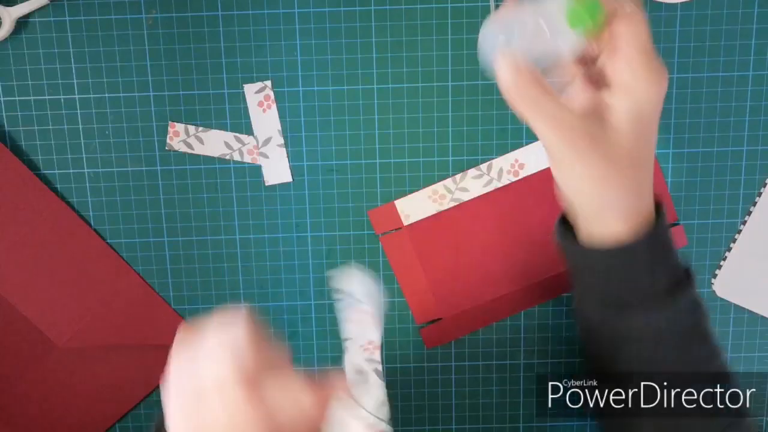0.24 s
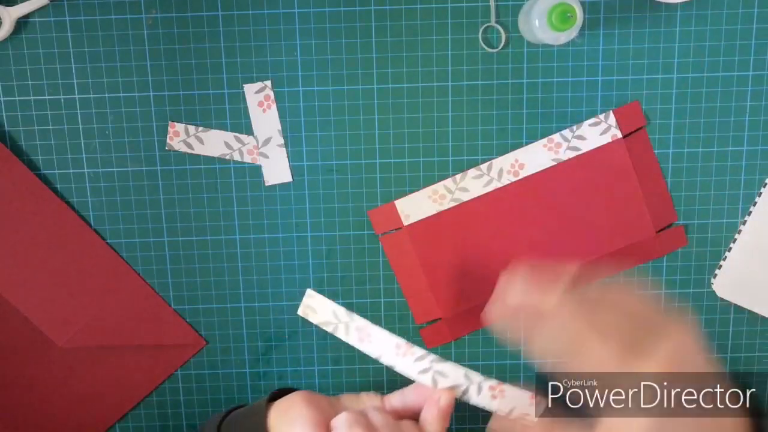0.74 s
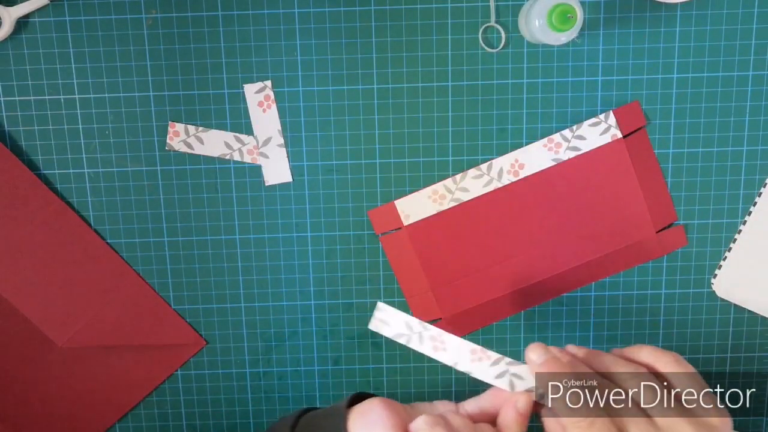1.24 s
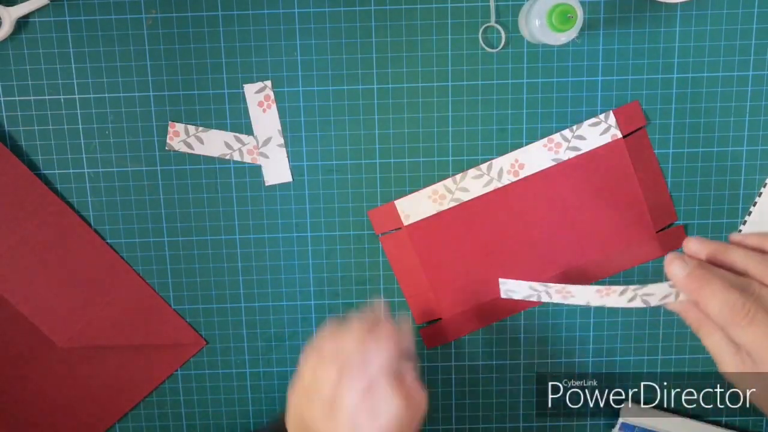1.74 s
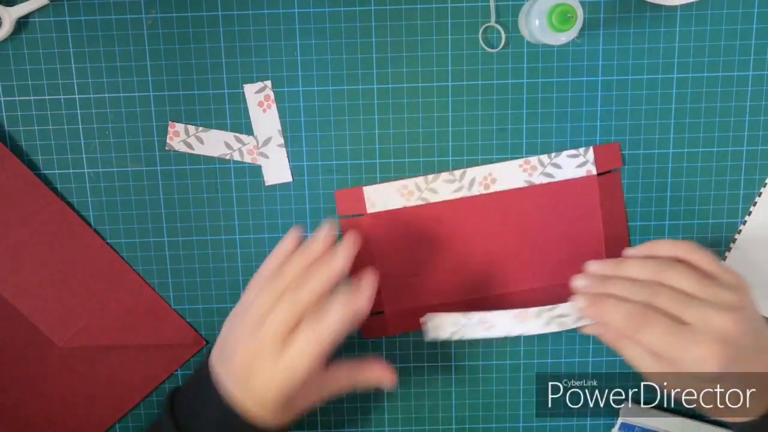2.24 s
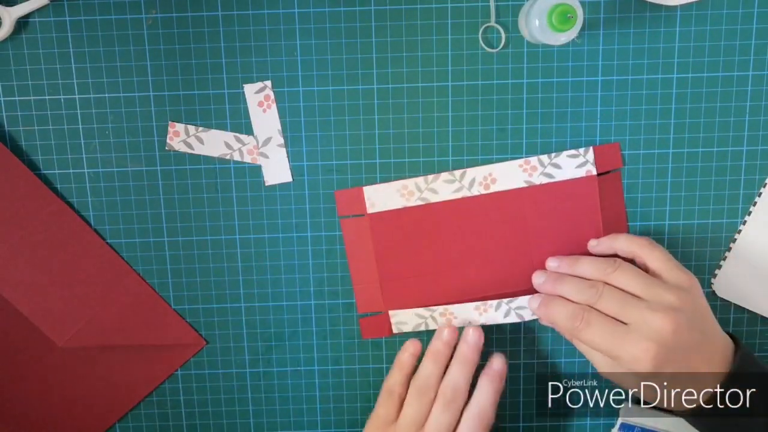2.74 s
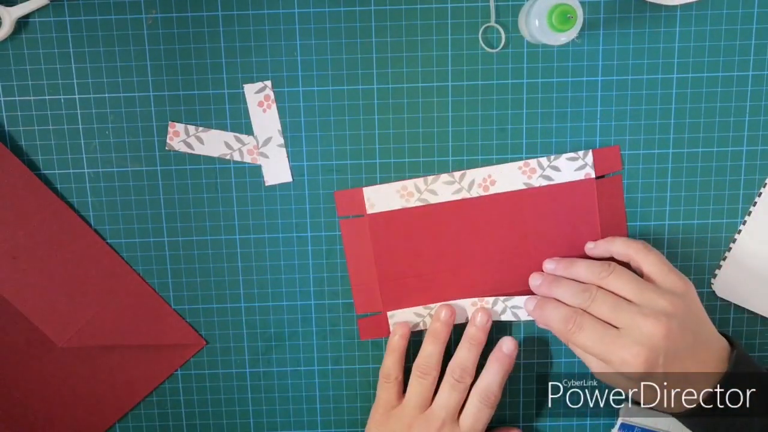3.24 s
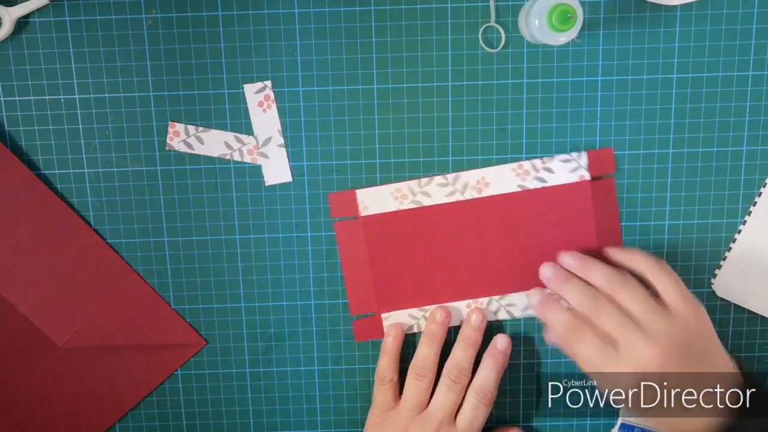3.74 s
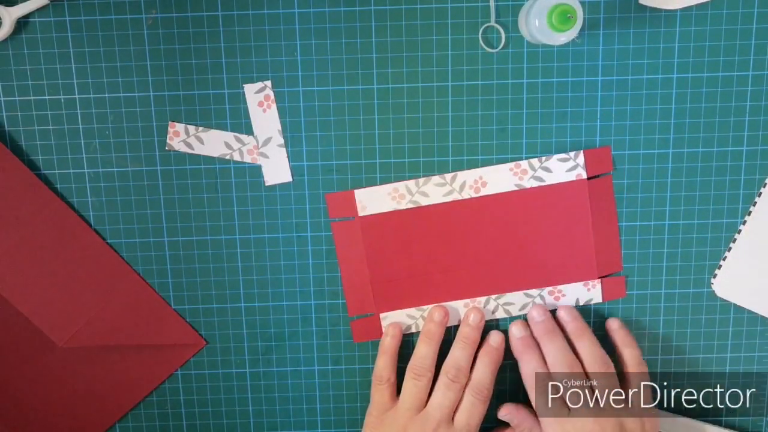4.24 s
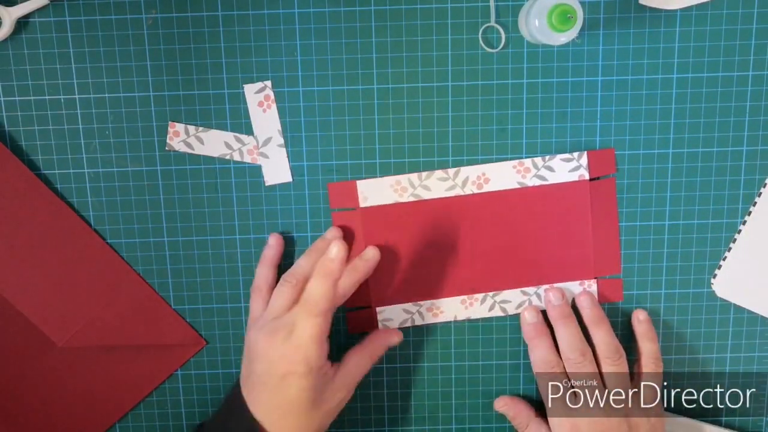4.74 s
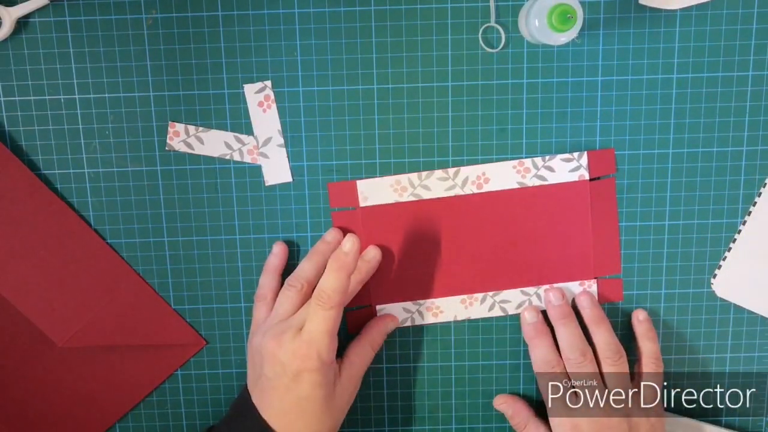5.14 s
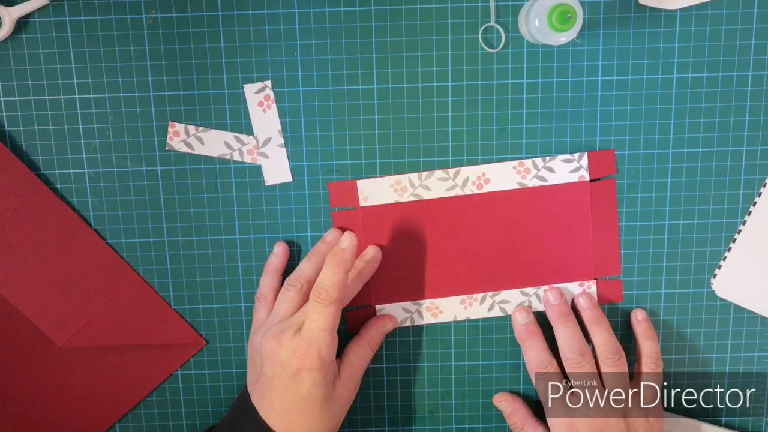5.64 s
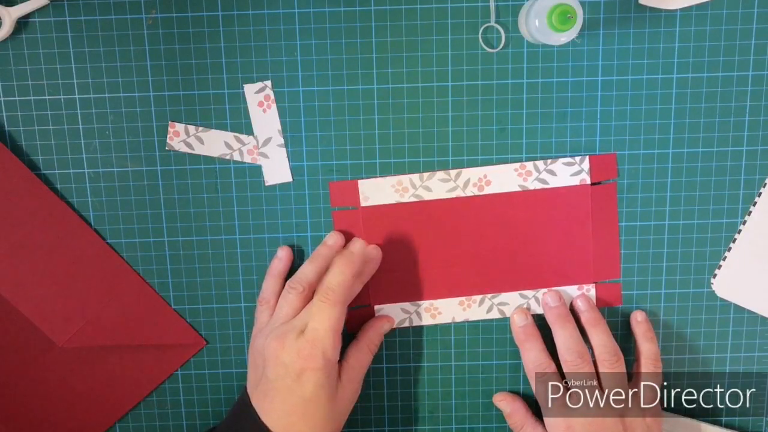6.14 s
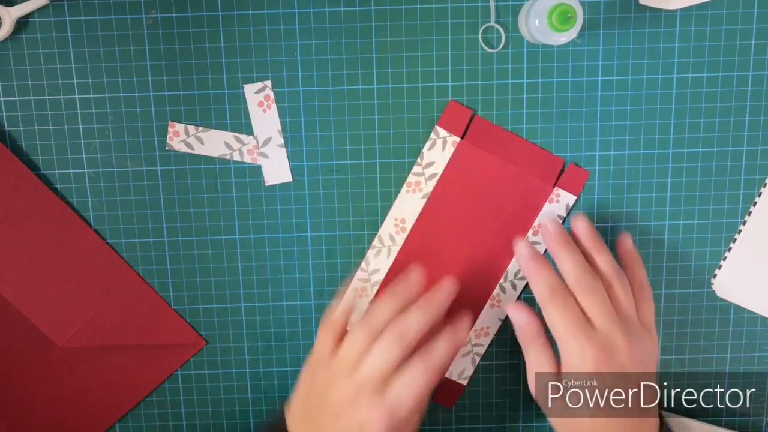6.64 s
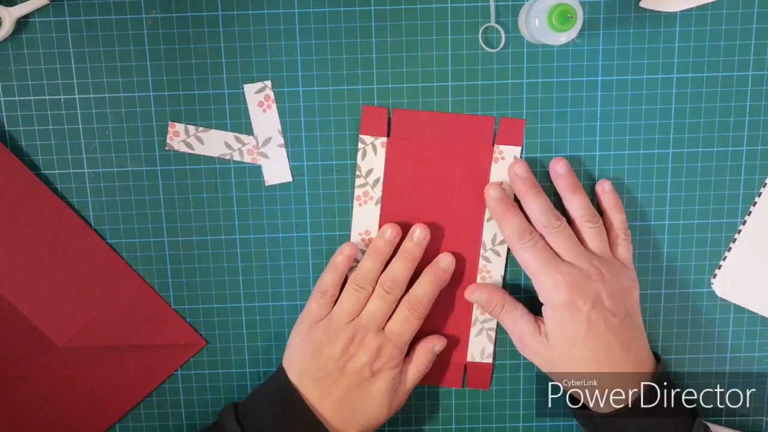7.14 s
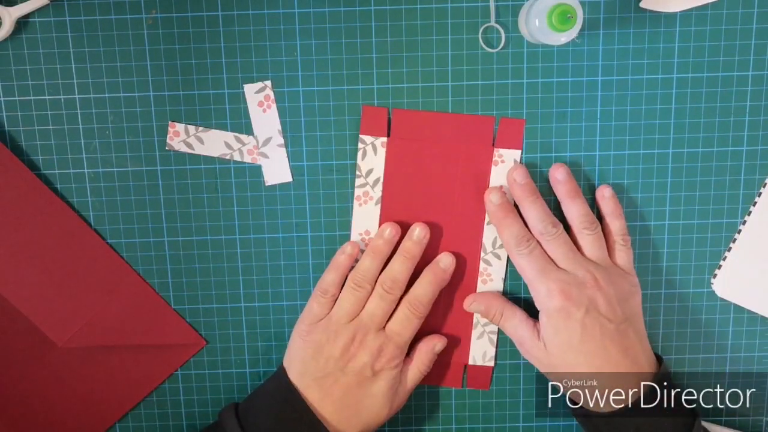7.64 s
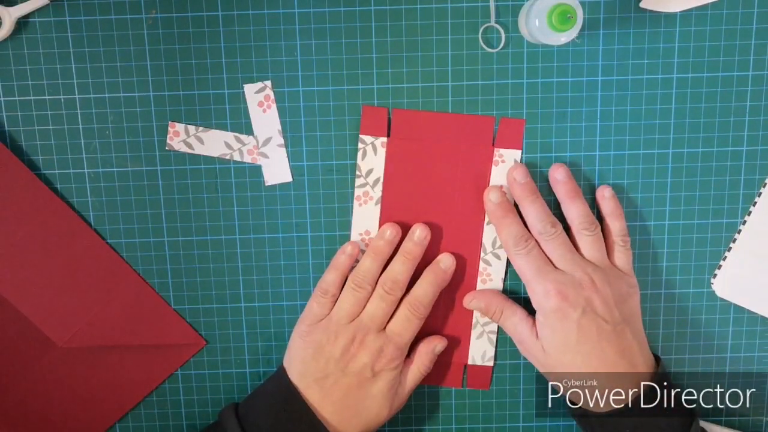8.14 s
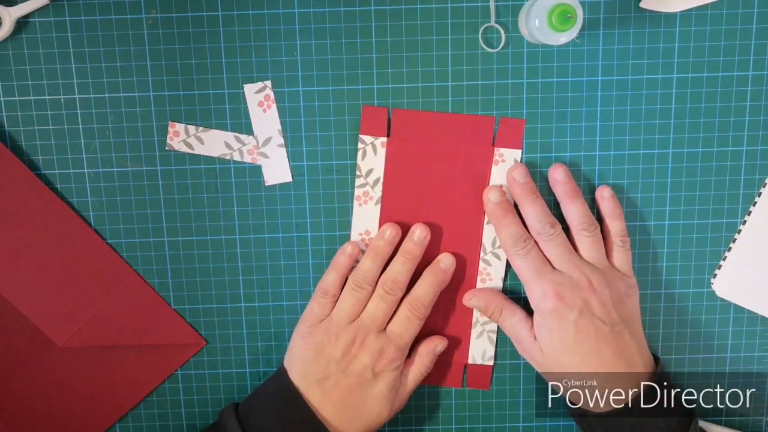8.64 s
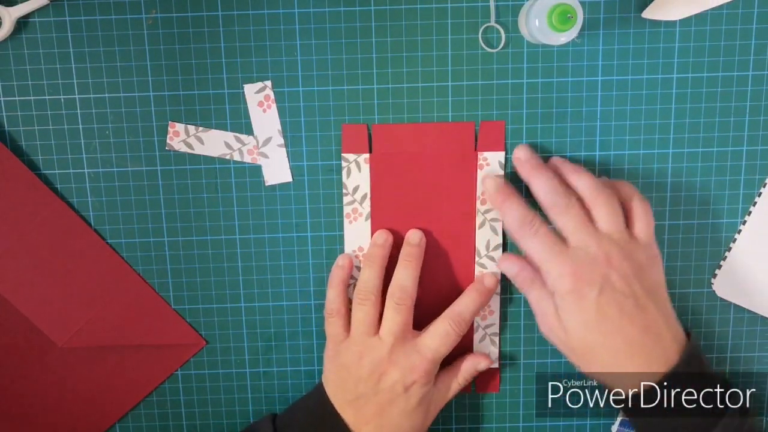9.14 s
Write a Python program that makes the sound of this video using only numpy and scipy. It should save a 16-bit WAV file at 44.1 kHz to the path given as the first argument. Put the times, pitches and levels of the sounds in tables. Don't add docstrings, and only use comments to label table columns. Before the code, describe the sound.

A plastic bottle knocks down on a craft table, then card rasps and snaps as fingertips pat paper onto it, in a quiet room.

```python
import sys
import numpy as np
from scipy import signal
from scipy.fft import rfft, irfft, next_fast_len
from scipy.io import wavfile

SR = 44100
rng = np.random.default_rng(int(sys.argv[2]) if len(sys.argv) > 2 else 0)


def put_to_file(sound):
    columns = np.atleast_2d(sound).T
    safe = np.clip(columns, -1, 1)
    whole_steps = np.round(safe * 32767)
    wavfile.write(sys.argv[1], SR, whole_steps.astype(np.int16))


def boost_factor(decibels):
    exponent = np.asarray(decibels, float) / 20
    return 10 ** exponent


N = 414094

# pitch_hz, level_db (per Hz)
ROOM_HUSH = [(150, 6), (250, -2.5), (515, -15), (1380, -13.5), (1810, -9), (2560, -12.5), (4210, -19),
             (5650, -21.5), (6260, -39.5), (7060, -31), (8390, -27.5), (14600, -23.5), (15300, -34)]
# pitch_hz, wander_hz, level_db
TABLE_SWAY = [(25, 2.51, -12.5), (48.8, 1.29, -3), (70.9, 0.99, -14)]
# pitch_hz, width_hz, level_db
TABLE_PANEL = [(61, 30, -5), (110.8, 16.5, 0), (155.3, 9.2, 1), (183.5, 12.3, -1.5), (233, 83, -17.5)]
# peak_s, build_s (per 10 dB), fade_s (per 10 dB), peak_db
ARM_LEANS = [(0.0, .1, 0, -54), (.54, -1.2, 0.8, -51.5), (.9, 2, 0, -53.5), (1.3, 0.1, 0.2, -53),
             (2.0, 0.45, 0.16, -53.5), (2.28, 0.4, .1, -54), (2.76, .4, .3, -55.5), (3.14, .28, 0.64, -52),
             (3.96, 0.26, 0.36, -48.5), (4.19, 0.67, -0.14, -49), (4.65, .4, 0.5, -58.5),
             (4.86, -0.5, 0.7, -58), (5.4, 1.1, -1, -59.5), (5.94, 0.54, 0.5, -55), (6.4, 0.06, -1, -55),
             (6.49, 0.03, 0.1, -48.5), (6.69, 0.2, 0.5, -56), (6.92, -0.06, 0.2, -47),
             (7.12, 0.37, -0.2, -49), (7.38, -0.05, 0.9, -51), (7.85, 0.5, 0, -51.5),
             (8.31, -1, 0.8, -56.5), (8.5, 0.1, 0.13, -50.5), (8.93, 0.15, -0.2, -51.5),
             (9.38, 2.5, 9, -55.5)]
# peak_s, build_s (per 10 dB), fade_s (per 10 dB), peak_db
HAND_PRESSES = [(.29, 0.1, 0.3, -67.5), (.54, -0.3, 0.7, -66.5), (1.01, 1, .33, -70), (1.51, 0.4, 1.5, -69),
                (2.29, -0.02, 0.1, -58.5), (2.57, 0.5, 2, -71), (3.14, 0, -8.5, -67), (3.57, 1, 0.2, -64.5),
                (3.96, -0.36, 1, -60), (4.08, -0.047, -0.04, -42.5), (4.19, -0.09, 0.06, -46),
                (4.36, .3, 0.5, -61), (4.86, 0.03, 0.2, -59), (5.39, 0.3, 0.3, -61), (5.9, 1.5, 0, -67.5),
                (6.2, 1.2, 0, -67.5), (6.4, -0.01, 0, -54), (6.59, 0.14, 0.25, -50.5),
                (6.85, 0.23, 0.1, -58), (6.92, -0.08, 0.2, -45.5), (7.1, .3, 0.2, -58),
                (7.38, 1, .06, -60.5), (7.5, 4.5, 9, -65.5), (7.88, -0.5, 0.7, -57.5),
                (8.2, 0, 0.14, -57.5), (8.5, -0.6, 2, -62), (9.13, -0.5, 1.5, -63), (9.38, 0.05, 5, -56)]
# pitch_hz, far_likeness (-1 to 1), near_likeness (-1 to 1)
PORT_LIKENESS = [(25, .9998, 1.0), (60, .996, 1.0), (160, .985, .99), (280, .7, .8), (500, -.3, -.2),
                 (1400, .3, .6), (3000, 0.0, .45), (5500, 0.0, .0)]
# pitch_hz, level_db
LEFT_OVER_RIGHT = [(1000, 0), (5000, 0.1), (8000, -2.5), (9800, 0), (11200, 7.5), (13500, 4), (15000, 2.5)]
# pitch_hz, level_db, ring_s (to fall 60 dB)
TABLE_MODES = [(49.3, -19, 0.19), (113, -5.5, 0.14), (193, -33, 0.046), (223, -1.5, 0.084), (266, 8, 0.02),
               (336, -1, 0.043), (387, -6.5, 0.053), (585, -16, .05), (742, -1.5, 0.032),
               (892, -2.5, 0.062), (1050, -13.5, 0.037)]
# start_s, peak_db, crack_db (relative to peak)
BOTTLE_HITS = [
    (0.5637, -16, -18.5),
    (0.589, -31, -30),
    (0.659, -40.5, -19),
    (0.706, -38, -32),
]
# start_s, slap_peak_db, thud_db (relative to slap), ring_s
STRIP_PATS = [
    (3.958, -35, -16, 0.07),
    (4.049, -34, -14, 0.1),
    (4.171, -39, -12, 0.11),
    (4.827, -74, 4, 0.088),
    (6.286, -60, 9, 0.039),
    (6.39, -54, -39, 0.022),
    (6.902, -45.5, 12, 0.048),
    (9.124, -49, -3, 0.07),
    (9.32, -68, 1.5, 0.05),
]
# pitch_hz, width_hz, level_db
SLAP_MODES = [(444, 120, -0.5), (924, 330, 2), (1290, 440, 0.5), (1830, 410, 0), (2720, 810, -2.5),
              (3150, 1200, -5.5), (5730, 2700, -17), (10200, 6500, -49)]
# start_s, peak_db, pitch_hz, edge_db (relative to peak), length_s
PAPER_SNAPS = [(0.0174, -52.5, 5600, 3, 0.0095), (0.071, -55, 5800, 0, 0.0058),
               (1.475, -60, 2420, -12, 0.011), (2.042, -47.5, 1810, -19, 0.023),
               (2.659, -54.5, 2370, -12, 0.016), (3.891, -42, 1660, -17, 0.011),
               (3.932, -51.5, 2720, 0, 0.015), (4.446, -54.5, 2140, -10, 0.013),
               (4.562, -48.5, 2540, -25, 0.012), (5.35, -46, 1300, -20, 0.02),
               (6.381, -52, 2220, 3.5, 0.013), (6.8457, -41.5, 2640, -17, 0.01),
               (6.8536, -38, 2720, -14, 0.023), (6.891, -38, 2600, -15, 0.014),
               (6.913, -39, 3630, 0, 0.009), (7.229, -55.5, 2960, -17, 0.017),
               (7.238, -58, 1550, -30, 0.0091), (7.486, -59.5, 2900, -15, 0.013),
               (7.795, -63, 3100, -7, 0.012), (8.791, -63, 3670, 3, 0.019)]
# start_s, peak_db, pitch_hz, length_s
STRIP_NUDGES = [
    (2.9796, -64, 2800, 0.07),
    (3.1677, -67, 2700, 0.045),
    (3.25, -63.5, 2720, 0.054),
    (3.305, -63.5, 2780, 0.037),
    (3.393, -67, 2650, 0.091),
    (3.609, -63.5, 2750, 0.063),
    (3.742, -67, 2800, 0.045),
    (3.828, -60, 2620, 0.039),
]
# pitch_hz, width_hz, level_db
STRIP_MODES = [(868, 53, 0.5), (1550, 87, 0.5), (2540, 66, -0.5)]
# start_s,
# peak_db, pitch_hz, ring_s
STRUCK_NOTES = [
    (4.883, -62.5, 2640, .015),
    (4.95, -61, 2600, .011),
    (6.288, -61, 330, .05),
    (6.389, -52.5, 270, 0.059),
    (7.485, -65, 312, .12),
    (9.32, -62, 940, .09),
                (.566, -40, 908, .08), (.566, -41, 1011, .08), (.565, -42, 77.8, .22),
               (2.041, -48.5, 1766, .035), (2.041, -54, 3050, .02), (3.891, -47, 1600, .03),
               (3.891, -49, 2750, .03), (3.959, -41.5, 2170, .03), (3.959, -48, 1240, .05),
               (3.977, -43, 1810, .045), (4.05, -45, 410, .08), (4.05, -44, 920, .08),
               (4.05, -43, 1260, .06), (4.05, -42, 1793, .04), (4.082, -47.5, 1800, .05),
               (4.131, -51.5, 1760, .04), (4.173, -44.5, 1013, .07), (4.173, -50, 635, .07),
               (4.173, -49, 1255, .06), (4.181, -48, 1755, .05), (4.066, -48, 3100, .03),
               (4.008, -50, 1800, .03), (4.197, -51, 3000, .03), (4.05, -35, 112, .14),
               (4.052, -41, 156, .1), (4.172, -39, 112, .14), (3.975, -43, 110, .14),
               (5.3499, -34, 1436, .011), (5.3497, -44, 2180, .009), (5.3497, -44, 3560, .008),
               (5.3497, -52, 5650, .008), (5.3497, -51, 7000, .008), (9.125, -55, 2077, .05),
               (9.125, -56, 1250, .04), (9.146, -57, 2000, .04), (9.128, -58, 4130, .03),
               (9.125, -59, 5800, .02), (9.149, -60, 4300, .02), (9.125, -57, 3000, .03),
               (.589, -27, 215, .13), (.564, -44, 3800, .02), (3.96, -45, 220, .08), (4.05, -42, 225, .08),
               (4.173, -47, 400, .1), (9.125, -54, 420, .06), (9.125, -52, 220, .07),
               (9.32, -62, 1150, .02), (1.475, -64, 2400, .015)]
# start_s, length_s, level_db, pitch_hz, width_hz
CARD_SINGS = [(2.14, 0.2, -51.5, 3000, 350), (2.21, .12, -56, 1700, 300), (4.555, .062, -64.5, 2450, 250),
              (4.557, .062, -69, 3250, 250), (4.64, .1, -71, 2400, 250), (4.685, .05, -74, 6700, 300),
              (4.72, .08, -72, 5550, 200), (6.4, 0.19, -50.5, 2670, 400), (6.9, .17, -55, 3150, 400),
              (6.999, 0.059, -56.5, 1720, 300), (6.931, .13, -57, 5500, 350),
              (8.799, .12, -66.5, 3300, 300), (8.839, .09, -71, 1760, 200), (8.808, 0.082, -70, 7000, 400),
              (6.32, 0.023, -69, 2700, 500), (6.85, .03, -60, 2750, 300)]
# start_s, speed_up_s, steady_run_s, level_db, bright_db
CARD_SLIDES = [(2.037, 0.004, 0.004, -53, -22), (2.0397, .2, 0.064, -44, -2),
               (3.861, 0.034, 0.0043, -52.5, -7.5), (3.91, 0.0086, .025, -64, 2),
               (6.378, 0.094, .17, -45.5, 2.5), (6.66, 0.021, 0.174, -65.5, 2.5),
               (6.87, 0.03, 0.022, -51.5, 0.5), (6.919, 0.025, .1, -55, 9), (2.06, 0.058, .08, -57, -9),
               (4.66, 0.065, 0.067, -76, 9.5), (7.64, 0.032, 0.096, -83.5, 11),
               (8.97, 0.048, 0.023, -79, 10.5), (4.25, 0.036, 0.195, -77, -10.5),
               (6.5, 0.05, 0.087, -52, 9.5), (5.94, 0.033, 0.055, -83.5, 0), (3.87, .02, 0.36, -82, 6),
               (4.555, .008, 0.043, -62.5, -5), (6.38, .005, .05, -58, 4), (7.03, .01, .035, -62, 3),
               (9.04, .02, .06, -83, 4.5)]
# start_s, speed_up_s, level_db, fade_db (per s), bright_db
HAND_BRUSHES = [(0.0, 0.01, -71.5, 86, 2.5), (.19, 0.055, -72.5, 37, -1.5), (.9, 0.08, -78, 19, -2.5),
                (1.45, .03, -74, 150, 3), (1.5, 0.044, -81.5, 12, 4.5), (2.33, .03, -74.5, 54, 3.5),
                (2.64, 0.015, -79, 13, 2.5), (2.7, 0.1, -75, 23, -1.5), (3.39, .03, -76, 197, -6),
                (3.52, .09, -82, 58, -2), (3.8, 0.08, -71, 104, -1), (3.95, 0.0085, -62.5, 53, 2.5),
                (4.525, 0.024, -66, 120, -7.5), (4.6, .05, -69, 56, 0), (4.88, 0.063, -81, 26, -1.5),
                (5.205, .012, -77.5, 250, 2), (5.45, 0.17, -86.5, -1.5, -6), (6.15, 0.23, -78.5, 300, -.5),
                (7.03, 0.011, -58.5, 203, 0.5), (7.1, .02, -73, 28, -5.5), (7.4, 0.18, -79, 44, -6.5),
                (8.0, 0.32, -85, 15, -8.5), (8.788, 0.094, -62, 206, 5), (9.2, 0.027, -78, 40, 3.5),
                (9.122, 0.0045, -60.5, 141, -4.5)]
# start_s, length_s, extra_crisp_db
EDGE_BITES = [
    (2.085, 0.26, 4.5),
    (3.84, .07, 3.5),
    (4.52, 0.14, 6),
    (6.39, 0.2, 2),
    (6.56, .14, -2.5),
    (6.92, 0.17, 2.5),
    (7.1, .55, -5),
    (8.786, .16, 1),
]
# middle_s, extra_db
EDGE_SNAGS = [(2.121, 2), (2.15, 3), (2.163, 5.5), (2.174, 2), (2.209, 2.5), (2.225, 3), (2.241, 3.5),
              (2.277, 2.5), (2.292, 2.5), (2.314, 5), (6.447, 2), (6.455, 2), (6.489, 5), (6.503, 3),
              (6.547, 4.5), (6.59, 2), (6.646, 2.5), (6.657, 2.5), (6.902, 4), (6.932, 5), (6.965, 2),
              (7.025, 3.5)]
# pitch_hz, width_hz, level_db
CARD_MODES = [(340, 65, -15), (1060, 510, -12.5), (1616, 327, -0.5), (2546, 450, 0.5), (2820, 145, 3.5),
              (3210, 690, -3), (4190, 2000, -3), (5600, 1170, 3), (7080, 1160, 0.5), (9560, 2540, -5),
              (11630, 4600, -12.5)]


def rms_one(x):
    return x / np.sqrt(np.mean(x ** 2) + 1e-20)


def at_hz(points, size, column=1):
    hz = np.maximum(np.arange(size // 2 + 1) * SR / size, 1)
    points = np.array(points)
    return np.interp(np.log(hz), np.log(points[:, 0]), points[:, column])


def drift(rate_hz):
    knots = rng.standard_normal(4000)[:int(N / SR * rate_hz) + 2]
    return np.interp(np.arange(N) / SR * rate_hz, np.arange(len(knots)), knots)


def window(start_s, length_s):
    out = np.zeros(N + SR)
    arch = np.sin(np.linspace(0, np.pi, max(round(length_s * SR), 2)))
    out[round(start_s * SR):][:len(arch)] = np.sqrt(np.abs(arch))
    return out[:N]


def cut(x, hz, kind, order=2):
    return signal.sosfilt(signal.butter(order, hz, kind, fs=SR, output="sos"), x)


def resonate(x, hz, width_hz):
    r = np.exp(-np.pi * width_hz / SR)
    top = [(1 - r * r) / 2, 0, (r * r - 1) / 2]
    return signal.lfilter(top, [1, -2 * r * np.cos(2 * np.pi * hz / SR), r * r], x + 1e-18)


def body(x, modes):
    return sum((-1) ** k * boost_factor(db) * resonate(x, hz, width) for k, (hz, width, db) in enumerate(modes))


def ring(x, hz, ring_s):
    r, w = boost_factor(-60 / (ring_s * SR)), 2 * np.pi * hz / SR
    return signal.lfilter([0, np.sin(w)], [1, -2 * r * np.cos(w), r * r], x + 1e-18)


def burst(start_s, ring_s, click):
    at = round(start_s * SR)
    t = np.arange(min(SR // 2, N - at)) / SR
    noise = rng.standard_normal((2, SR // 2))[:, :len(t)] * boost_factor(-60 * t / max(ring_s, .002))
    noise[:, 0] += click
    return at, noise


def ports(mid, side, column):
    size = next_fast_len(N + SR)
    alike = np.clip(at_hz(PORT_LIKENESS, size, column), -1, 1)
    lean = boost_factor((column - 1) * at_hz(LEFT_OVER_RIGHT, size) / 2)
    shared = np.sqrt((1 + alike) / 2) * rfft(mid, size)
    opposed = np.sqrt((1 - alike) / 2) * rfft(side, size)
    return np.sqrt(2) * irfft([(shared + opposed) * lean, (shared - opposed) / lean], size)[:, :N]


def swells(rows):
    t, level_db = np.arange(N) / SR, np.full(N, -120.)
    for peak_s, build_s, fade_s, peak_db in rows:
        before = (peak_s - t) / max(build_s, .005)
        after = (t - peak_s) / max(fade_s, .005)
        level_db = np.maximum(level_db, peak_db - 10 * np.maximum(before, after))
    return level_db


def tremble(sway_db, panel_db):
    sway = np.zeros(N)
    for hz, wander_hz, db in TABLE_SWAY:
        cycles = np.cumsum(hz + wander_hz * drift(5.4)) / SR
        sway += boost_factor(db) * np.sin(2 * np.pi * cycles)
    panel = body(rng.standard_normal(N), TABLE_PANEL)
    panel = cut(cut(panel, 32, "high"), 278, "low")
    return boost_factor(sway_db + 2.5 * drift(9)) * rms_one(sway) + boost_factor(panel_db) * rms_one(panel)


def background():
    size = next_fast_len(N)
    hush = rfft(rng.standard_normal((2, size))) * boost_factor(at_hz(ROOM_HUSH, size))
    hush = irfft(hush, size)[:, :N]
    rumble = tremble(swells(ARM_LEANS), swells(HAND_PRESSES))
    mid, side = boost_factor(-72.5) * rms_one(hush) + [rumble, np.roll(rumble, SR // 30)]
    return ports(mid, side, column=1)


def echo_tails():
    t = np.arange(SR // 2) / SR
    ring_s, set_in_s, dull_hz = 0.3, 0.001, 6800
    tails = rng.standard_normal((2, len(t))) * boost_factor(-60 * t / ring_s) * np.clip(t / set_in_s, 0, 1)
    return cut(tails, dull_hz, "low")


def room(x, tails):
    tails = tails[None] / np.sqrt(np.sum(tails ** 2))
    one, other = signal.fftconvolve(x[:, None], tails, axes=2)[..., :N]
    return ports(one[0] + other[1], one[1] - other[0], column=1)


def table_top(blows, contact_hz, spread_db):
    out, luck = np.zeros(N), rng.standard_normal((len(blows), len(TABLE_MODES)))
    seconds, blow_db = np.transpose(blows)
    for k, (hz, db, ring_s) in enumerate(TABLE_MODES):
        clicks = np.zeros(N)
        clicks[np.round(seconds * SR).astype(int)] = -boost_factor(blow_db + db + spread_db * luck[:, k])
        out += ring(clicks, hz, ring_s)
    return cut(out, contact_hz, "low")


def table_thuds():
    landings = [(s, db - 7.5) for s, db, crack_db in BOTTLE_HITS]
    knocks = table_top(landings, contact_hz=1400, spread_db=1.0)
    knocks = resonate(knocks, 303, 326) + boost_factor(-12.0) * cut(knocks, 670, "high")
    hum_s, hum_db, hum_hz, hum_ring_s = .704, -41.5, 219.6, 0.17
    hum = ring(boost_factor(hum_db) * (np.arange(N) == round(hum_s * SR)), hum_hz, hum_ring_s)
    presses = [(s, db + thud_db - 0.5) for s, db, thud_db, ring_s in STRIP_PATS]
    pushes = table_top(presses, contact_hz=120, spread_db=5.5)
    return knocks + resonate(hum, hum_hz, 60) + pushes


def bottle_cracks():
    crack = np.zeros((2, N))
    for s, db, crack_db in BOTTLE_HITS:
        at, noise = burst(s, 0.013, click=8.0)
        crack[:, at:at + noise.shape[1]] += boost_factor(db + crack_db + 10.5) * noise
    knock = cut(cut(crack, 620, "high"), 1570, "low", order=1)
    knock += boost_factor(-14.5) * resonate(crack, 6800, 2550)
    return cut(knock, 6830, "low", order=6)


def pat_slaps():
    slaps = np.zeros((2, N))
    for s, db, thud_db, ring_s in STRIP_PATS:
        at, noise = burst(s, ring_s, click=4.3)
        slaps[:, at:at + noise.shape[1]] += boost_factor(db + 5.5) * noise
    return cut(body(slaps, SLAP_MODES), 12600, "low", order=4)


def paper_snaps():
    out = np.zeros((2, N))
    for s, db, hz, edge_db, length_s in PAPER_SNAPS:
        at, noise = burst(s, length_s, click=2.9)
        snap = resonate(noise, hz, 1270) + boost_factor(edge_db - 6.0) * resonate(noise, 4100, 6600)
        out[:, at:at + noise.shape[1]] += boost_factor(db + 8.0) * snap
    return cut(cut(out, 890, "high"), 8900, "low", order=4)


def strip_nudges():
    out = np.zeros((2, N))
    for s, db, hz, length_s in STRIP_NUDGES:
        at, swell = round((s - .01) * SR), np.hanning(round(length_s * SR))
        noise = rng.standard_normal((2, SR // 4))[:, :len(swell)] * swell
        squeak = resonate(resonate(noise, hz, 300), hz, 400)
        out[:, at:at + len(swell)] += boost_factor(db + 5.5) * squeak
    return out


def thumb_creep():
    start_s, length_s, level_db = 6.92, 0.78, -78
    friction = rms_one(body(rng.standard_normal((2, N)), STRIP_MODES))
    return boost_factor(level_db) * window(start_s, length_s) * friction


def ticks_and_knocks():
    out, t = np.zeros(N + SR), np.arange(SR // 2) / SR
    contact_s, rattle_spread_db = .0012, 4.0
    start = np.minimum(t / contact_s, 1)
    for s, db, hz, ring_s in STRUCK_NOTES:
        step = t * hz / 8
        rattle_db = np.interp(step, np.arange(400), rng.standard_normal(400))
        rattle_db = rattle_db * rattle_spread_db * np.minimum(step, 1)
        level = boost_factor(db + rattle_db - 60 * t / max(ring_s, .003))
        out[round(s * SR):][:len(t)] += start * level * np.sin(2 * np.pi * hz * t)
    return out[:N]


def card_sings():
    out = np.zeros((2, N))
    for s, length_s, db, hz, width_hz in CARD_SINGS:
        at, noise = round(s * SR), rng.standard_normal((2, SR // 4))
        tone = rms_one(resonate(resonate(noise, hz, width_hz), hz, width_hz))
        swell = window(s, length_s)[at:at + SR // 4]
        out[:, at:at + SR // 4] += boost_factor(db) * tone * swell
    return out


def hand_strokes():
    t = np.arange(0, N + 32, 32) / SR
    slide_stop_db_per_s = 520
    strokes = [(s, rise, run, db, slide_stop_db_per_s, bright) for s, rise, run, db, bright in CARD_SLIDES]
    strokes += [(s, rise, 0, db, fade, bright) for s, rise, db, fade, bright in HAND_BRUSHES]

    fidget_db, fidget_bright_db = -89.5, 6
    power = np.full(len(t), boost_factor(2 * fidget_db))
    colour, speeding = power * fidget_bright_db, np.zeros(len(t))
    for s, rise, run, db, fade, bright in strokes:
        speed = np.clip((t - s) / max(rise, .002), 0, 1)
        fallen_db = abs(fade) * np.maximum(t - s - rise - run, 0)
        share = (speed * boost_factor(db - fallen_db)) ** 2
        power = power + share
        colour = colour + share * bright
        speeding = speeding + share * (1 - speed ** 4)

    curves = 10 * np.log10(power), colour / power, speeding / power
    level_db, bright_db, speeding = (np.interp(np.arange(N) / SR, t, c) for c in curves)
    firmness_db = level_db + 80
    crisp_db = -1.5 + 0.44 * bright_db + 0.059 * firmness_db + 3 * speeding
    crisp_db += sum(db * window(s, length_s) for s, length_s, db in EDGE_BITES)
    weight_db = 1.5 - 0.46 * firmness_db + 0.28 * bright_db
    return level_db, crisp_db, bright_db, weight_db


def card_rubbing(level_db, crisp_db, bright_db, weight_db):
    slips_per_s, uneven_db, flicker_db, snag_s = 9000, 1.0, 1.1, 0.0063
    sizes = boost_factor(uneven_db * np.minimum(rng.exponential(1, N), 5))
    slips = rms_one(sizes * (rng.random(N) < slips_per_s / SR))
    signs = rng.choice([-1, 1], (2, 2, N))
    coarse, fine = slips * boost_factor(level_db + flicker_db * drift(120)) * signs
    coarse = coarse * boost_factor(sum(db * window(s - snag_s / 2, snag_s) for s, db in EDGE_SNAGS))

    heavy = cut(body(fine * boost_factor(weight_db + 9.5), CARD_MODES[:2]), 1950, "low")
    firm = body(coarse, CARD_MODES[2:4]) + body(coarse * boost_factor(crisp_db), CARD_MODES[4:6])
    firm = cut(firm, 1340, "high", order=3)
    bright = cut(body(fine * boost_factor(bright_db - 1.5), CARD_MODES[6:]), 3500, "high")
    bright = cut(bright, 13400, "low", order=10)
    return boost_factor(10.5) * (heavy + firm + bright)


def scene():
    rubbed = card_rubbing(*hand_strokes())
    struck = bottle_cracks() + pat_slaps()
    snapped = paper_snaps() + strip_nudges()
    table = table_thuds()
    tails, ground = echo_tails(), background()
    faint = thumb_creep() + card_sings()
    knocked = ticks_and_knocks() * [[1], [.5]]

    near = ports(*(rubbed + struck + snapped + faint + knocked), column=2)
    near = near * boost_factor(np.array([[-0.7], [0.7]]) / 2)
    echoed = boost_factor(-16.0) * rubbed + boost_factor(-4.0) * struck + boost_factor(-8.5) * snapped
    echoed = echoed + boost_factor(-9.5) * table + boost_factor(-13.0) * knocked
    return near + table + room(echoed, tails) + ground


def top_cut(x):
    return signal.sosfilt(signal.butter(12, 15480, fs=SR, output="sos"), x)


def record(dry):
    return top_cut(dry)


dry = scene()
out = record(dry)
put_to_file(out)
```